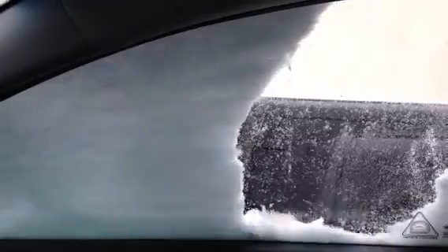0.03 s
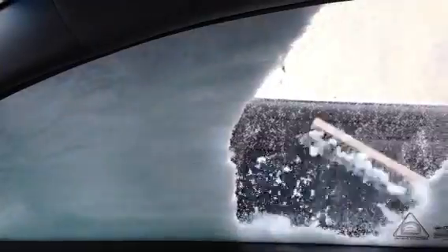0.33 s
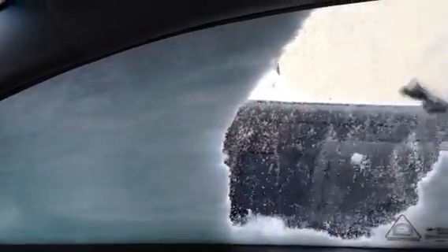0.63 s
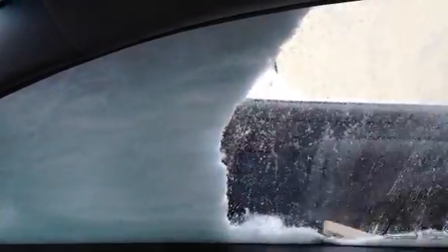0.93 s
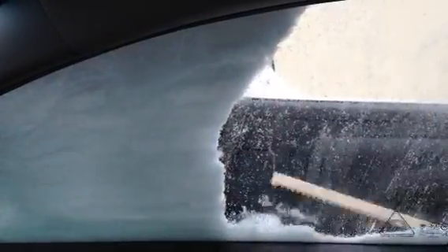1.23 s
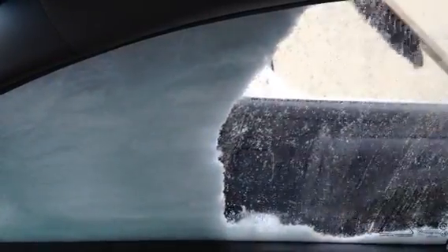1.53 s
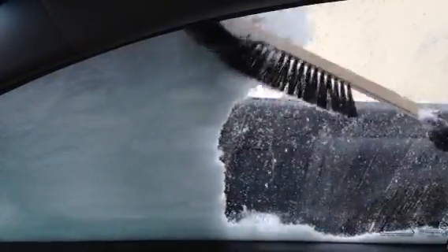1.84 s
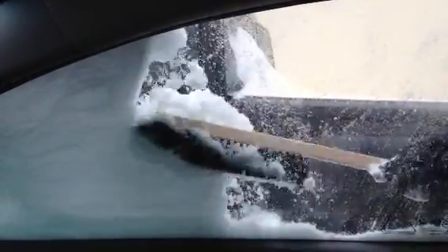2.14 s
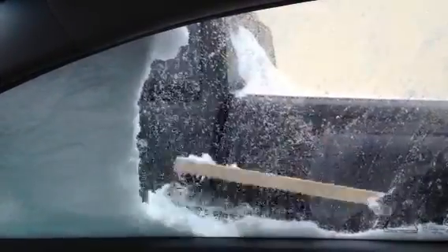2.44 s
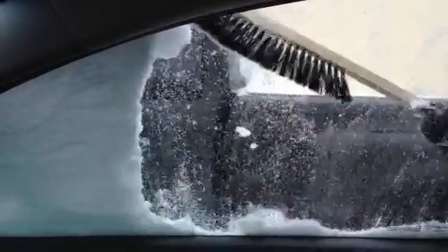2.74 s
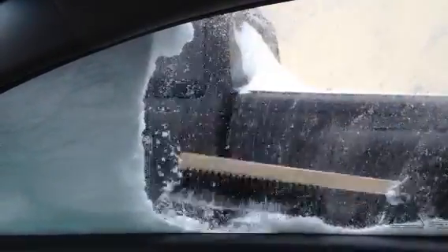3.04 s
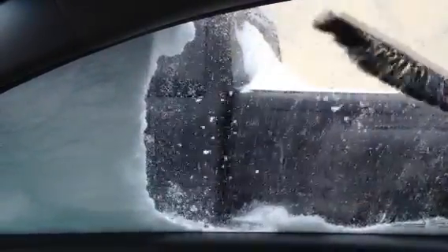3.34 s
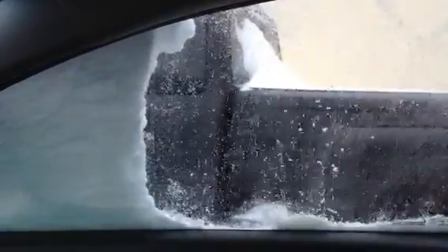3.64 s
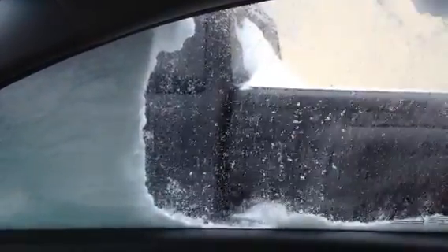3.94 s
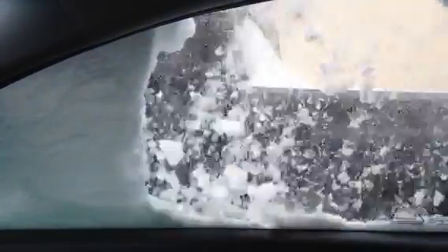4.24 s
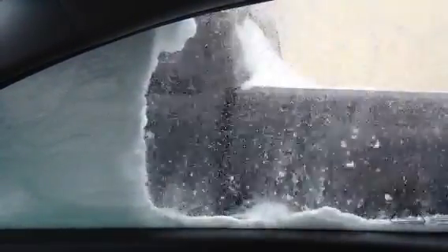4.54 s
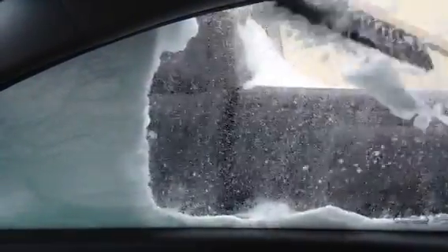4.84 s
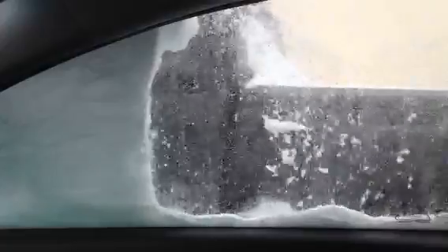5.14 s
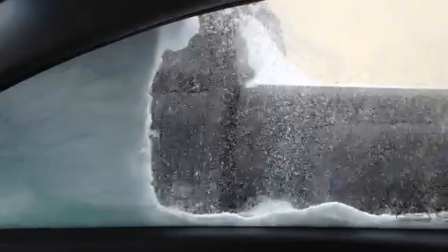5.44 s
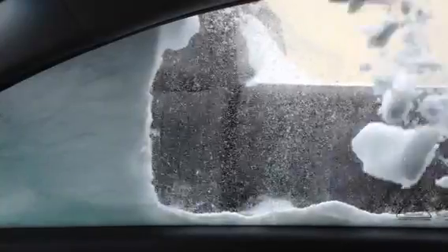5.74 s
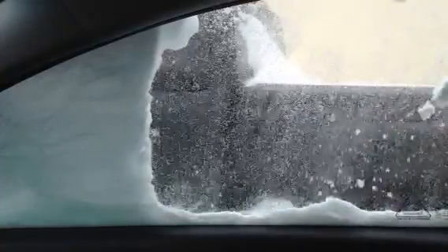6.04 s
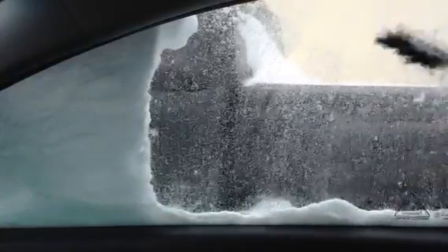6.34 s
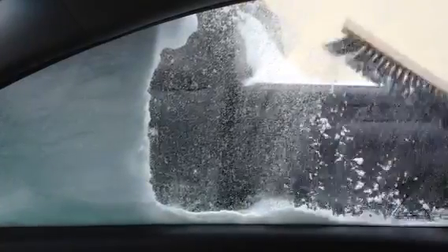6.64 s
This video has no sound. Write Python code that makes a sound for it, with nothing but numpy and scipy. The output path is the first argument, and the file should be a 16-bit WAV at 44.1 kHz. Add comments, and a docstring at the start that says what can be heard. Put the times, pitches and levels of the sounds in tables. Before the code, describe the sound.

From inside a car, the low hum of the idling engine and the rush of the heater run throughout. Outside, a brush repeatedly slaps onto the side window and swishes down it, pushing off snow. About three seconds in comes the loudest sound, a quick cluster of wooden knocks with a short boom from the door. The sweeping then carries on with light thuds, small ice clicks and softly slipping snow.

```python
"""Inside an idling car, heard from the seat: a long wooden snow brush clears the side window.
The bristles slap onto the glass and swish down it in thousands of tiny slips. The wooden head
knocks on the window and the door and makes both ring. Ice grains snap, loose snow slides off,
and the engine and the heater fan hum underneath."""
import sys
import numpy as np
from scipy import signal
from scipy.fft import rfft, irfft
from scipy.io import wavfile

SR = 44100
rng = np.random.default_rng(int(sys.argv[2]) if len(sys.argv) > 2 else 0)


def materialize(psi):
    """Save the field psi as 16-bit PCM at rate SR to the path in sys.argv[1].

    A 1-D psi becomes a single channel; in a 2-D psi each row is a channel.
    """
    bounded = np.clip(np.atleast_2d(psi).T, -1, 1)
    quanta = np.round(bounded * 32767).astype(np.int16)
    wavfile.write(sys.argv[1], SR, quanta)


N = 303408
TIME = np.arange(N) / SR
HIT_TIME = TIME[:SR // 3]  # seconds since a hit

# Levels are relative: they compare the rows of one table.
# bristles dragged down the glass: start/s, length/s, level/dB, change by the end/dB, added for fizz/dB
STROKES = [(0.049, 0.078, -49, -13, -7), (0.677, 0.39, -45.5, -17, -7), (1.691, 0.73, -58, -8, -7),
           (2.764, 0.27, -60.5, 0, -5), (3.39, 0.11, -51.5, -6.5, -2.5), (3.921, 0.25, -52.5, -6.5, -4),
           (4.28, 0.015, -61, 1, -5.5), (4.687, 0.29, -58, -3.5, -6), (5.447, 0.43, -62, -3.5, -6),
           (6.189, 0.34, -67.5, 13, -7)]
# the arm speeds up within a stroke: middle/s, half length/s, swish boost/dB, fizz boost/dB
ARM_PUSHES = [(0.783, 0.016, 2, 4), (1.874, 0.045, 4.5, 8), (2.318, 0.04, 9, 13.5), (2.863, 0.025, 15, 15),
              (4.014, 0.014, 6, 7), (4.166, 0.054, 5.5, 2), (4.857, 0.043, 9.5, 12.5),
              (4.936, 0.028, 11.5, 12), (5.743, 0.052, 11, 13.5), (6.377, 0.048, 12.5, 15.5),
              (6.467, 0.044, 7.5, 11.5)]
# tone of the bristles heard through the window: f/Hz, level/dB
SWISH_TONE = [(150, -9.5), (500, 0.5), (1050, 3.5), (1400, -4.5), (1800, 5), (2300, 3), (3100, 4),
              (4400, 2), (5100, -5), (6300, -3), (8000, -12), (10500, -34.5), (15000, -32)]
# tone of the hissing bristle tips: f/Hz, level/dB
FIZZ_TONE = [(3000, -39.5), (5500, -4), (7800, 1.5), (9500, -3.5), (11500, -8.5), (14000, -3.5),
             (16000, -14)]
# bristles landing: t/s, level/dB, rise/s, low edge/Hz, high edge/Hz, head pitch/Hz, pock/dB, boom/dB
SLAPS = [(0.649, -34.5, 0.0013, 502, 9200, 603, -40, -67),
         (1.670, -35.5, 0.0084, 2200, 8950, 374, -45, -52),
         (2.339, -44.5, 0.0029, 704, 9000, 507, -55, -40), (2.746, -55.5, 0.0043, 900, 7960, 463, -59, -60),
         (2.859, -53, 0.0043, 400, 7000, 268, -44, -41), (3.361, -35, 0.0046, 304, 8000, 453, -41, -34.5),
         (3.897, -48, 0.004, 300, 2500, 1017, -54, -44), (3.934, -46, 0.005, 1000, 9000, 505.5, -52, -59),
         (4.651, -49.5, 0.0031, 1000, 2800, 1810, -52, -66),
         (5.390, -46, 0.0029, 200, 2780, 923, -44.5, -40), (6.203, -48, 0.0027, 398, 4130, 912.4, -49, -46),
         (6.526, -40, 0.0053, 497, 2620, 1794, -46, -52),
         (6.844, -33.5, 0.0067, 1303, 6900, 1060, -48, -42)]
# tone of a landing heard through the window: f/Hz, level/dB
SLAP_TONE = [(100, -31), (250, 16.5), (500, 6), (1100, 4.5), (1500, 3), (2000, 3), (3300, 4.5), (4500, -1),
             (5300, -3.5), (7500, -4.5), (10500, -15.5), (15000, -7)]
# wood hitting glass and door: t/s, level/dB, treble limit/Hz (higher is harder), door boom/dB
KNOCKS = [(2.284, -38.5, 700, -40.5), (2.946, -35.5, 1506, -32.5), (3.009, -29, 7140, -26),
          (3.016, -28, 600, -25.5), (3.0252, -15, 6511, -30.5), (3.047, -26, 3200, -31.5),
          (5.389, -38, 1100, -51)]
# tone of wood cracking against glass: f/Hz, level/dB
CRACK_TONE = [(90, -40.5), (190, 2.5), (290, 0.5), (480, 6.5), (720, -13), (950, -1.5), (3000, -4.5),
              (4500, -13.5), (7000, -13.5), (10500, -21.5), (15000, -15)]
# notes the window rings with: f/Hz, level/dB, t60/s (time to fade by 60 dB)
WINDOW_NOTES = [(328, -6.5, 0.042), (421.2, -5.5, 0.12), (508, 5.5, 0.035), (840, -4.5, 0.08),
                (960, 2, 0.12), (1155, -4.5, 0.1), (1215, -12, 0.16), (1450, -9, 0.071), (1590, -5.5, 0.17),
                (1672, 0, 0.096), (1990, 2, 0.071), (2150, -2, 0.085), (2157, 1, 0.072), (2520, -11, 0.05),
                (2990, 9, 0.048), (3150, 1, 0.057), (3306, -5, 0.061), (3550, -9, 0.07), (3768, -11, 0.06),
                (4050, -2.5, 0.096), (4450, -1.5, 0.049)]
# notes the door panel rings with: f/Hz, level/dB, t60/s
DOOR_NOTES = [(124.3, -11, 0.22), (147.2, -3, 0.14), (200, -0.5, 0.086), (229, -2.5, 0.095)]
# ice grains catching under the bristles: t/s, level/dB, f/Hz, t60/s
ICE_SNAPS = [(4.643, -42.5, 4440, 0.016), (5.494, -53, 5700, 0.08), (5.576, -52, 3300, 0.019),
             (5.929, -48.5, 3188, 0.012)]
# loose snow sliding down the glass: middle/s, half length/s, level/dB
SNOW_SLIDES = [(2.15, 0.13, -62), (4.523, 0.27, -60.5), (6.028, 0.23, -66)]
# tone of the sliding snow: f/Hz, level/dB
SNOW_TONE = [(400, 11), (1100, -1.5), (1900, -5), (2600, -5.5), (4000, -27), (9000, -21)]
# how fast the engine fires: t/s, f/Hz
FIRING_RATE = [(0.1, 44.78), (0.38, 45.8), (0.52, 44.38), (2.03, 45.08), (2.8, 44.54), (3.6, 44.62),
               (4.63, 44.41), (6.05, 45.02), (6.85, 44.33)]
# notes in the engine's hum, plus a low blower tone near 290 Hz (row 6.5): pitch multiplier, level/dB
HUM_NOTES = [(1, -75), (2, -73), (3, -62.5), (4, -59), (5, -73), (6.5, -58.5), (8, -74), (9, -55.5),
             (11, -68)]
# notes in the fan's whine: f/Hz, level/dB
FAN_NOTES = [(846, -65), (1572, -79.5), (1766, -78.5), (2019, -79.5)]
# tone of the heater air and engine rumble: f/Hz, level/dB
AIR_TONE = [(25, -35.5), (70, -20.5), (115, -2), (190, 3), (380, -2.5), (520, -8), (650, -11.5),
            (810, -6.5), (950, -15), (2000, -21.5), (2700, -29), (6500, -33.5), (10500, -39.5),
            (14500, -34)]


def brush_strokes():
    """Bristles slip on the glass thousands of times a second; the clicks blur into swish and fizz."""
    swish_level, fizz_level = brush_drag()
    judder = amp(drift(rate_hz=39))
    swish = colour(swish_level * judder * slips(per_s=7000, spread_db=1.5), SWISH_TONE)
    fizz = colour(fizz_level * judder * slips(per_s=12000, spread_db=0), FIZZ_TONE)
    rubbing = edge_echo(amp(-1.5) * swish + amp(-2.5) * fizz, echo_db=-16, delay_s=0.00089)
    return cabin(rubbing, wet_db=-11.5, t60=0.044)


def brush_drag():
    """Strength of swish and fizz: each stroke grips, slides and lifts, and swells as the arm pushes."""
    grip_s, lift_s = 0.015, 0.063
    bend_s, unbent_db = 0.04, -9.5  # the tips fizz less until the bristles have bent over
    swish, fizz = np.zeros(N), np.zeros(N)
    for start, length, db, change_db, fizz_db in STROKES:
        t = np.arange(0, length + 3 * lift_s, 1 / SR)
        grip = 1 - np.exp(-t / grip_s)
        lift = np.exp(-(np.maximum(t - length, 0) / lift_s) ** 2)
        level = grip * lift * amp(db + change_db * np.minimum(t / length, 1))
        add(swish, start, level)
        add(fizz, start, level * amp(fizz_db + unbent_db * np.exp(-t / bend_s)))
    for middle, half, swish_db, fizz_db in ARM_PUSHES:
        push = swell(middle, half)
        swish *= amp(swish_db * push)
        fizz *= amp(fizz_db * push)
    uneven = amp(1.15 * drift(rate_hz=10))  # patches of snow and bare glass
    return swish * uneven, fizz * uneven


def bristle_slaps():
    """The bristles land almost together; the wooden head gives a short pock and the door a soft boom."""
    landing_s, pock_fade_s = 0.018, 0.017
    bristles, thuds = np.zeros(N), np.zeros(N)
    clicks = slips(per_s=6300, spread_db=1)
    door = cut_bass(ring(DOOR_NOTES), corner_hz=96, order=3)
    for start, db, rise, low_hz, high_hz, head_hz, pock_db, boom_db in SLAPS:
        touch = 1 - np.exp(-(HIT_TIME / rise) ** 2)
        landing = touch * np.exp(-(HIT_TIME / landing_s) ** 3)
        clicks_now = np.roll(clicks, -round(start * SR))[:len(HIT_TIME)]
        burst = cut_treble(landing * clicks_now, high_hz)
        add(bristles, start, amp(db + 2) * cut_bass(burst, low_hz))  # tips alone sound thin
        pock = touch * np.exp(-HIT_TIME / pock_fade_s) * np.sin(2 * np.pi * head_hz * HIT_TIME)
        add(thuds, start, amp(pock_db) * pock)
        add(thuds, start + rise, amp(boom_db) * door)
    inside = through_window(colour(bristles, SLAP_TONE), ring_db=-20)
    return thuds + cabin(inside, wet_db=-7, t60=0.06)


def wood_knocks():
    """The wooden head hits: a sharp crack, a ringing window and a booming door."""
    out = np.zeros(N)
    window = ring(WINDOW_NOTES) * np.exp(-(HIT_TIME / 0.029) ** 3)  # the resting brush hushes the glass
    door = ring(DOOR_NOTES)
    for start, db, treble_hz, boom_db in KNOCKS:
        crack = colour(fading_noise(t60=0.053) + amp(-11) * fading_noise(t60=0.099), CRACK_TONE)
        add(out, start, amp(db - 2) * cut_treble(crack + window, treble_hz, order=2))
        add(out, start, amp(boom_db) * door)
    return cut_bass(out, corner_hz=98, order=4)


def ice_snaps():
    """Frozen grains catch under the bristles with small, bright snaps."""
    out = np.zeros(N)
    for start, db, hz, t60 in ICE_SNAPS:
        band = signal.butter(2, [hz * 0.8, hz * 1.2], "band", fs=SR, output="sos")
        add(out, start, amp(db + 9.5) * signal.sosfilt(band, fading_noise(t60)))
    return out


def sliding_snow():
    """Powder runs down the window in soft swells of noise."""
    flow = sum(amp(db) * swell(middle, half) for middle, half, db in SNOW_SLIDES)
    return colour(flow * rng.standard_normal(N), SNOW_TONE)


def idle_hum():
    """The idling engine hums with wavering notes, joined by a low blower tone near 290 Hz."""
    firings = np.cumsum(np.interp(TIME, *np.transpose(FIRING_RATE))) / SR
    hum = np.zeros(N)
    for multiple, db in HUM_NOTES:
        level = amp(db + 1.4 * drift(rate_hz=3.8))
        hum += level * np.sin(2 * np.pi * (multiple * firings + rng.random()))
    return hum


def heater():
    """Air rushes from the heater, and its fan whines thinly at a slightly unsteady speed."""
    fan_time = np.cumsum(1 + 0.00287 * drift(rate_hz=3.9)) / SR
    whine = sum(amp(db + 1.1 * drift(rate_hz=2.5)) * np.sin(2 * np.pi * hz * fan_time)
                for hz, db in FAN_NOTES)
    air = amp(-55) * colour(rng.standard_normal(N), AIR_TONE)
    return whine + air


def edge_echo(x, echo_db, delay_s):
    """The window's edge throws the vibration back, after a delay that changes as the brush moves."""
    delay = delay_s * np.exp(0.318 * drift(rate_hz=1.92))
    echo = np.interp(TIME - delay, TIME, x)
    return (x + amp(echo_db) * echo) / np.sqrt(1 + amp(echo_db) ** 2)


def through_window(x, ring_db):
    """Bristle noise also sets the glass ringing."""
    glass = ring(WINDOW_NOTES)
    return x + amp(ring_db) * signal.oaconvolve(x, glass / np.linalg.norm(glass))[:N]


def cabin(x, wet_db, t60):
    """The padded inside of the car adds many short echoes; wet_db sets how loud they are."""
    tail = fading_noise(t60) * (HIT_TIME > 0.0015)
    echoes = signal.oaconvolve(x, tail / np.linalg.norm(tail))[:N]
    return (x + amp(wet_db) * echoes) / np.sqrt(1 + amp(wet_db) ** 2)


def slips(per_s, spread_db):
    """Single bristles slip and click at random times; spread_db makes the clicks uneven in size."""
    size = amp(spread_db * np.minimum(rng.exponential(1, N), 4))
    direction = rng.choice([-1, 1], N)
    slipping = rng.random(N) < per_s / SR
    return unit_level(size * direction * slipping)


def ring(notes):
    """A struck panel rings with several fading notes; each starts inward or outward."""
    waves = [rng.choice([-1, 1]) * amp(db - 60 * HIT_TIME / t60) * np.sin(2 * np.pi * hz * HIT_TIME)
             for hz, db, t60 in notes]
    return sum(waves) / np.linalg.norm(amp([db for _, db, _ in notes]))


def fading_noise(t60):
    """Noise that fades by 60 dB in t60 seconds."""
    return rng.standard_normal(len(HIT_TIME)) * np.exp(-np.log(1000) * HIT_TIME / t60)


def swell(middle, half):
    """A smooth hump of height 1 around a time."""
    return np.exp(-np.minimum(((TIME - middle) / half) ** 2, 50))


def drift(rate_hz):
    """A slow random wander with a typical size of 1."""
    hz = np.fft.rfftfreq(N, 1 / SR)
    slow_part = rfft(rng.standard_normal(N)) * np.exp(-(hz / rate_hz) ** 2)
    return unit_level(irfft(slow_part, N))


def colour(x, tone):
    """Gives a sound the tone in a table; plain white noise keeps its power."""
    tone_hz, db = np.transpose(tone)
    hz = abs(np.fft.fftfreq(2 ** 12, 1 / SR))
    log_gain = np.log(amp(np.interp(np.log(hz + 1), np.log(tone_hz), db)))
    response = np.fft.ifft(np.exp(np.conj(signal.hilbert(log_gain)))).real  # never rings ahead of a hit
    return signal.oaconvolve(x, response / np.linalg.norm(response))[:len(x)]


def cut_treble(x, corner_hz, order=1):
    """Turns down the highs above corner_hz, as a softer touch does."""
    return signal.lfilter(*signal.butter(order, corner_hz, fs=SR), x)


def cut_bass(x, corner_hz, order=2):
    """Turns down the lows below corner_hz."""
    return signal.sosfilt(signal.butter(order, corner_hz, "high", fs=SR, output="sos"), x)


def amp(db):
    """Turns decibels into a number to multiply by."""
    return 10 ** (np.asarray(db) / 20)


def unit_level(x):
    """Scales a signal to an average power of 1."""
    return x / np.sqrt(np.mean(x ** 2) + 1e-20)


def add(mix, start, sound):
    """Mixes a sound in at a start time in seconds."""
    part = mix[round(start * SR):][:len(sound)]
    part += sound[:len(part)]


def scene():
    """Everything as it reaches the seat, in one channel."""
    background = idle_hum() + heater()
    brush = brush_strokes() + bristle_slaps() + wood_knocks()
    return (background + brush + ice_snaps() + sliding_snow())[None]


def record(dry):
    """The sound comes in after a moment of silence, with the very highest treble cut away."""
    silent_s, fade_s, top_hz = 0.083, 0.003, 15450
    fade_in = np.clip((TIME - silent_s) / fade_s, 0, 1)
    treble_cut = signal.firwin(511, top_hz, window=("kaiser", 9), fs=SR)
    return signal.oaconvolve(dry * fade_in, treble_cut[None], "same")


dry = scene()
out = record(dry)
materialize(out)
```